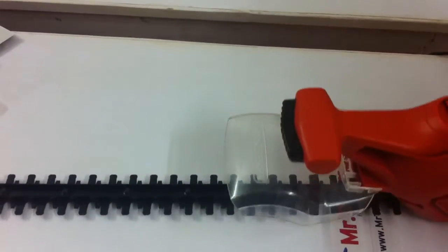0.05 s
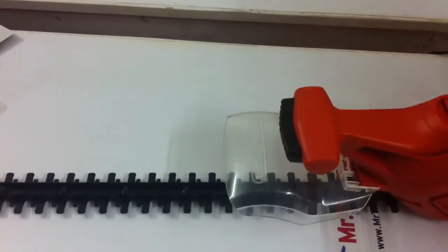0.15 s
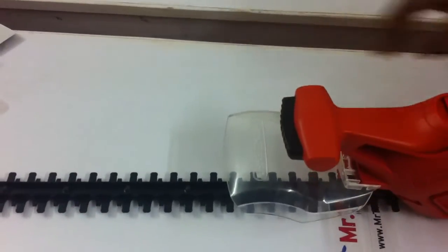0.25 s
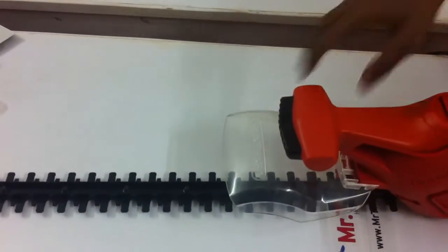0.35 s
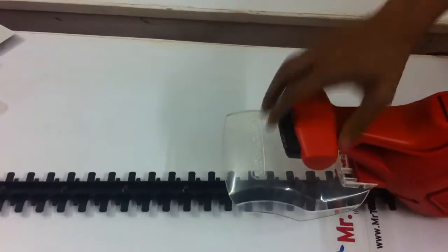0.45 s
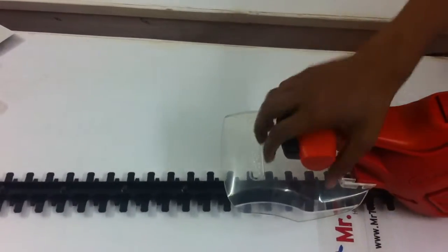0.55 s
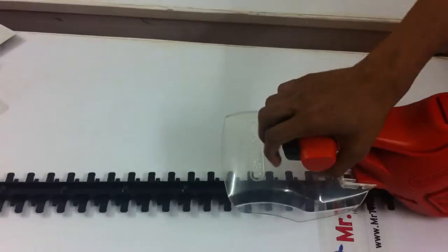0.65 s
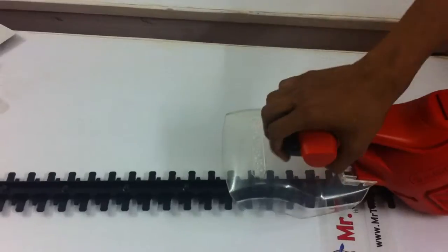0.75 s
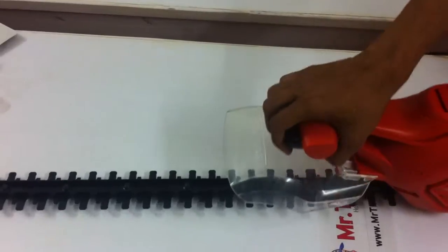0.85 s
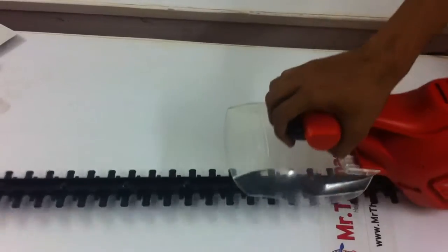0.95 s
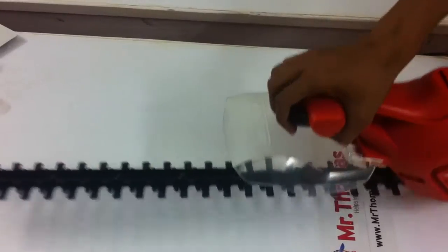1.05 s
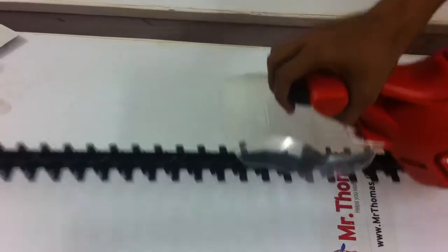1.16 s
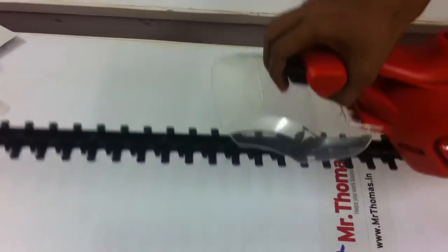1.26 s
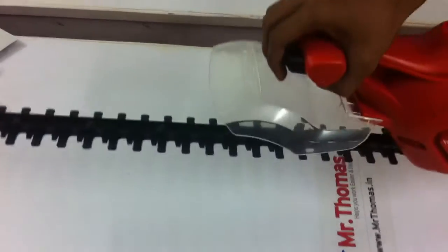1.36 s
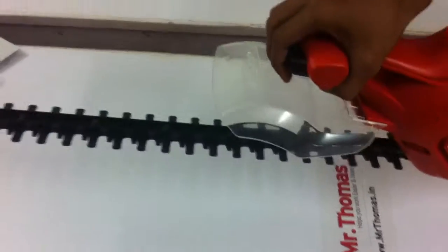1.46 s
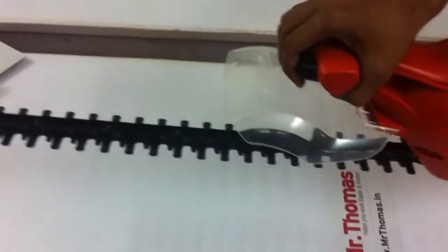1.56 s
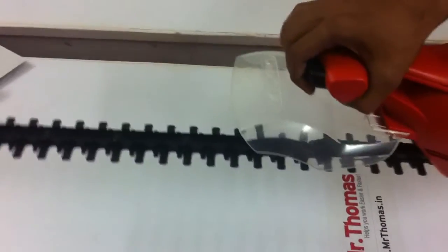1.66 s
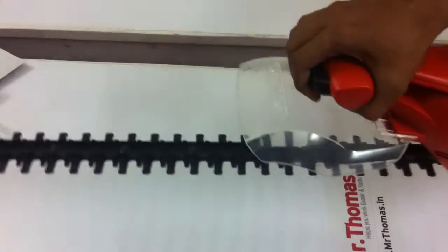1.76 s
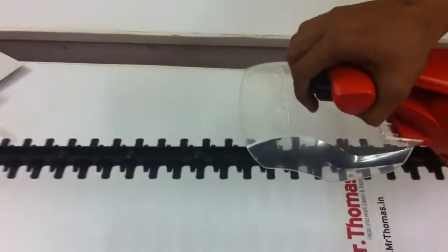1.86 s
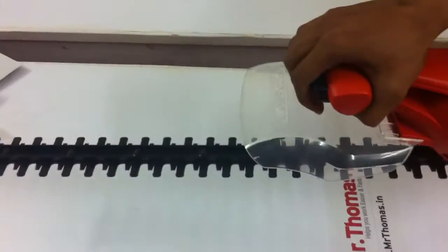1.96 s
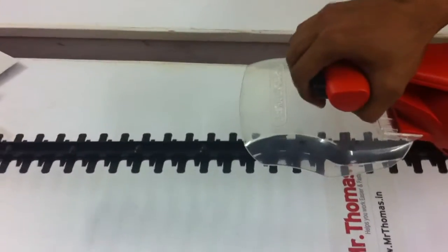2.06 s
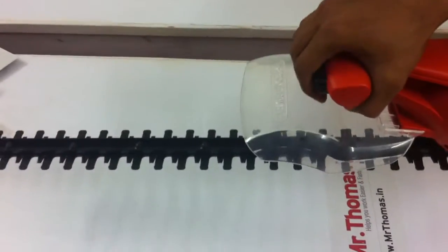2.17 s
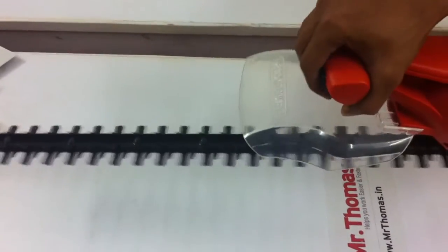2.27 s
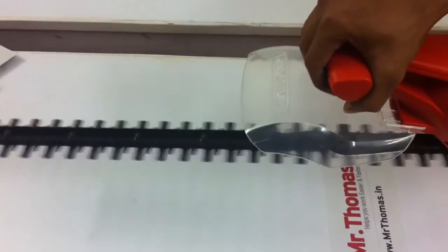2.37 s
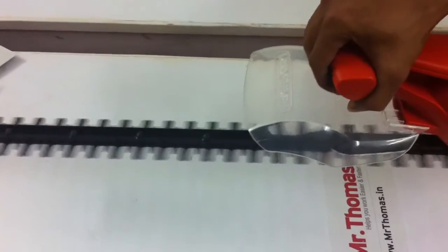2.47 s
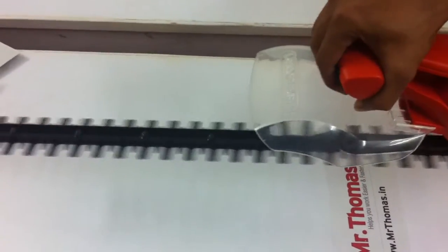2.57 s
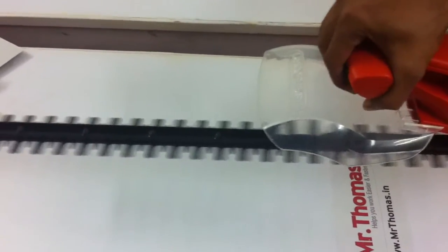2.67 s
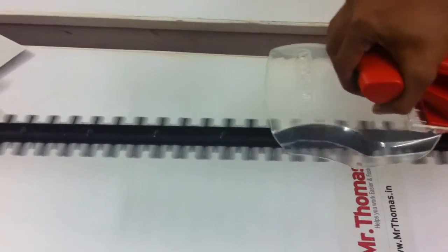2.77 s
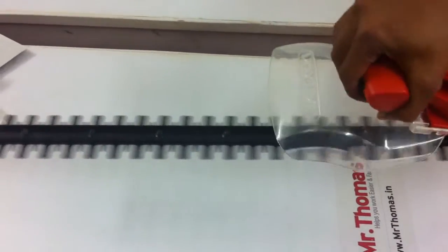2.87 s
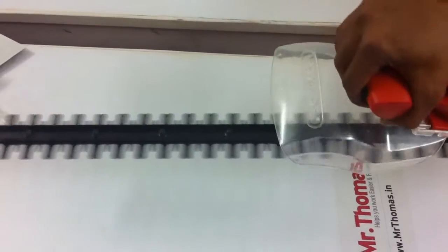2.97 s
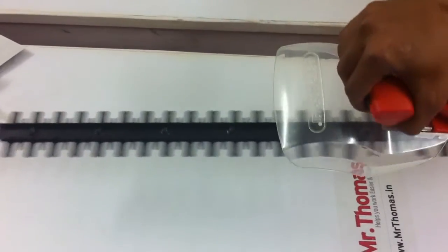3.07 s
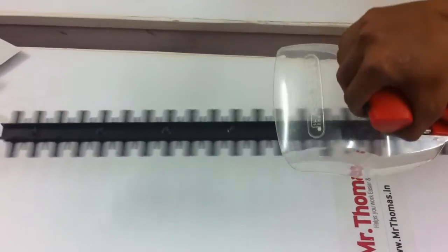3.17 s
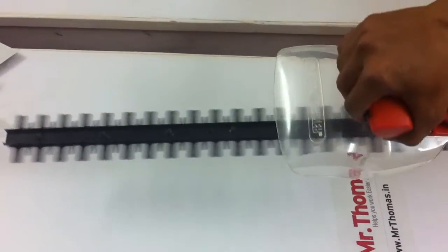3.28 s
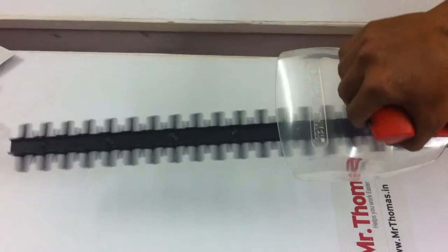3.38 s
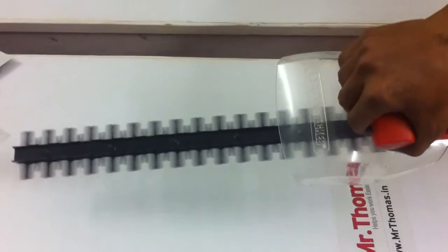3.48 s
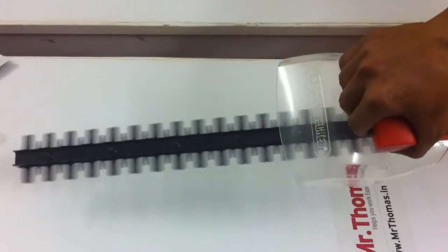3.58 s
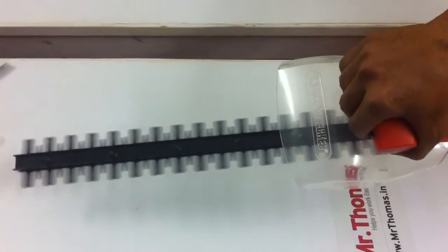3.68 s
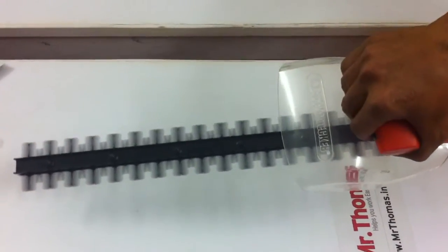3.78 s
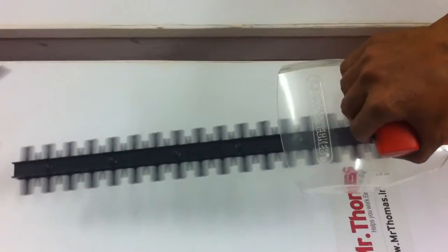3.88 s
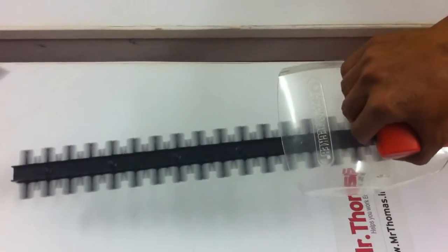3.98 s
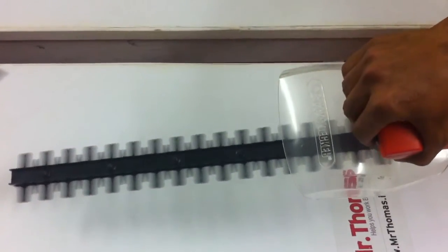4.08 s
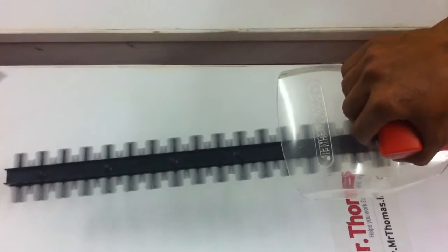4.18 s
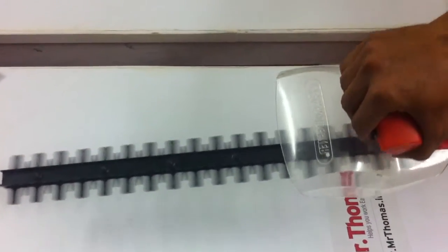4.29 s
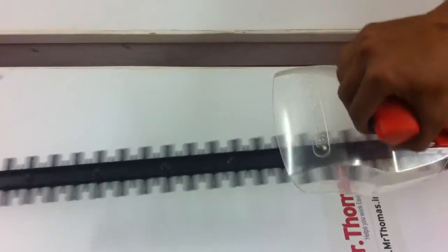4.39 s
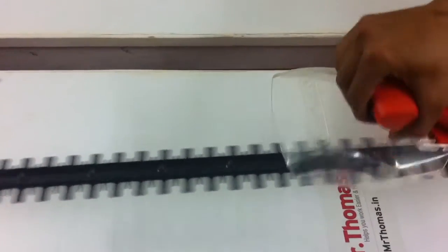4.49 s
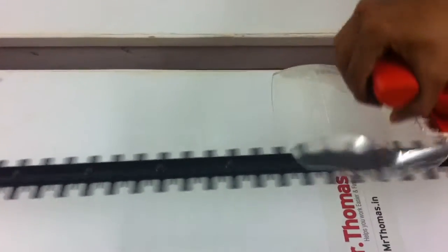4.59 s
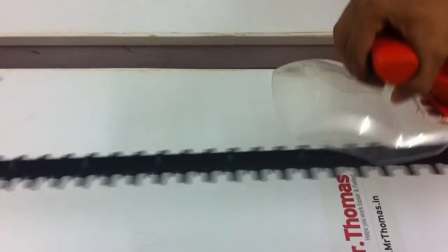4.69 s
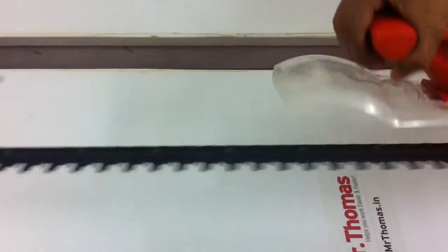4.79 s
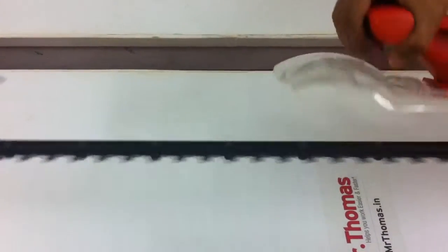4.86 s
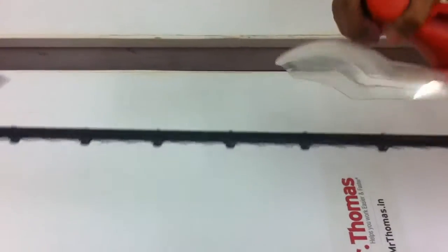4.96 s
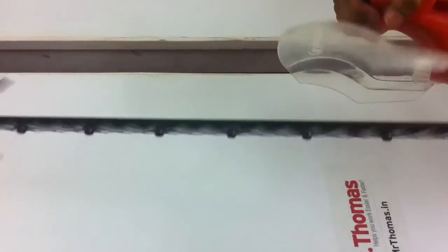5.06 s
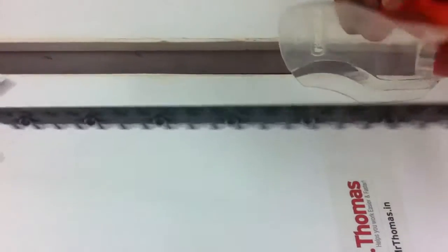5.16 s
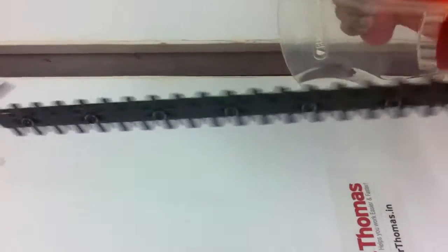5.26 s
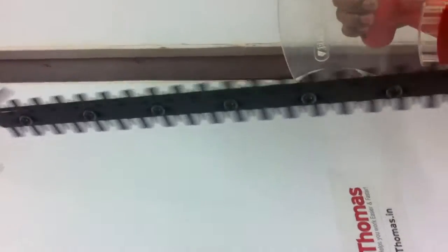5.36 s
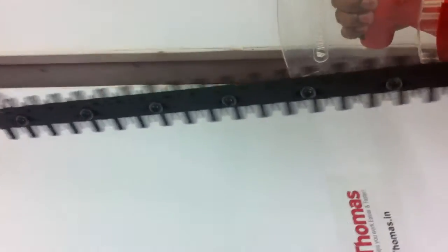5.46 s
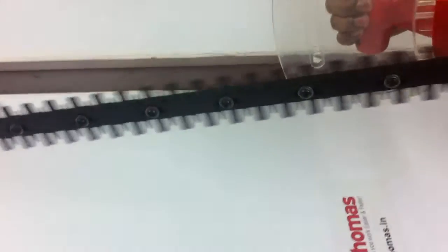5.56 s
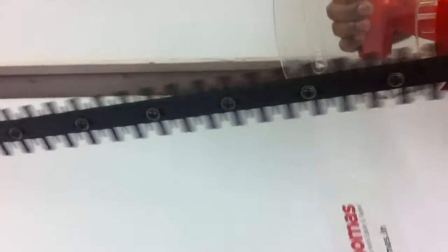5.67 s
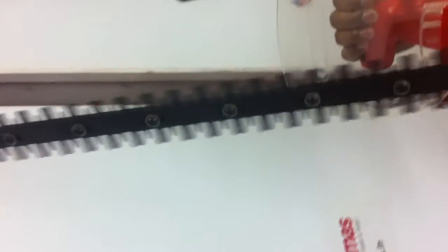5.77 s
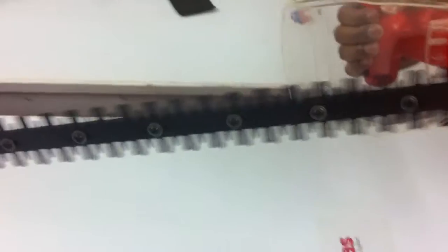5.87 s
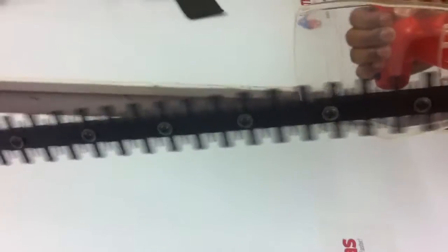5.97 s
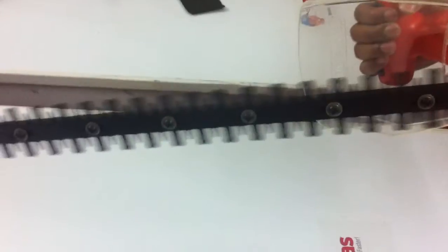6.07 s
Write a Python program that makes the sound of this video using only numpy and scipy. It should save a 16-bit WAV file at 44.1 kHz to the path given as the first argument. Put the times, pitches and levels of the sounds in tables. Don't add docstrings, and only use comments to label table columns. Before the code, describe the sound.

In a hard-walled room with a faint dull hum, a hand takes hold of a plastic tool handle with small clicks and soft rustle. More clicks follow, ending in a sharp switch snap. An electric hedge trimmer then runs up within a fraction of a second and stays on, a loud, bright, rattling buzz picked up close by one microphone.

```python
import sys
import numpy as np
from scipy import signal
from scipy.fft import rfft, irfft, next_fast_len
from scipy.io import wavfile
from scipy.ndimage import uniform_filter1d, minimum_filter1d

SR = 44100
rng = np.random.default_rng(int(sys.argv[2]) if len(sys.argv) > 2 else 0)


def ratio(d):
    e = np.asarray(d, float) / 20
    return 10 ** e


def to_wav(sig):
    pcm = np.clip(np.atleast_2d(sig), -1, 1) * 32767
    pcm = np.round(pcm).astype(np.int16)
    wavfile.write(sys.argv[1], SR, pcm.T)


N = 270333
START_S = 2.355


def rms_one(x):
    return x / np.sqrt(np.mean(x ** 2) + 1e-20)


def bump(x, centre, width):
    return np.exp(-((x - centre) / width) ** 2)


def drift(rate):
    step = 40
    r = np.exp(-2 * np.pi * rate * step / 2 * 2 / SR)
    noise = rng.standard_normal(N // step + 4002)
    slow = signal.lfilter([1], [1, -2 * r, r * r], noise)[4000:]
    return np.interp(np.arange(N) / step, np.arange(len(slow)), rms_one(slow))


def shaped(x, spectrum, levels_db, centres, patchy_db, peaks=(), count=17):
    size = next_fast_len(N)
    log_hz = np.log(np.arange(size // 2 + 1) * SR / size + 1)
    colour_hz, colour_db = np.transpose(spectrum)
    db = np.interp(log_hz, np.log(colour_hz), colour_db)
    for hz, width, top_db in peaks:
        db = db + top_db / (1 + (2 * (np.exp(log_hz) - hz) / width) ** 2)
    full = rfft(x, size) * ratio(db)

    log_centres = np.log(centres)
    zone = np.digitize(log_hz, (log_centres[1:] + log_centres[:-1]) / 2)
    mean_db = [np.median(curve) for curve in levels_db]
    missing_db = []
    for k, wanted_db in enumerate(mean_db):
        power = 2 * np.sum(abs(full[zone == k]) ** 2) / size / N
        missing_db.append(wanted_db - 10 * np.log10(power))

    out = np.zeros(N)
    knots = np.log(np.geomspace(70, 18000, count))
    for k, knot in enumerate(knots):
        window = np.interp(log_hz, knots, np.arange(count) == k)
        band = irfft(full * window, size)[:N]
        change_db = 0
        for j, curve in enumerate(levels_db):
            share = np.interp(knot, log_centres, np.arange(len(centres)) == j)
            change_db = change_db + share * (curve - mean_db[j])
        out += band * ratio(change_db + patchy_db * drift(3.0))
    return out * ratio(np.mean(missing_db))


def hum():
    # (frequency [Hz], density [dB per Hz])
    hum_colour = [(20, -42), (50, -39), (70, -16), (88, -29), (118, -5), (260, -.6), (447, -4.5),
                  (479, -12.5), (561, -7), (806, -13.5), (1110, -10), (2800, -27), (15600, -45.5)]
    # (time [s], width [s], gain [dB])
    rustles = [
        (.63, .15, 3),
        (2.27, .1, 2),
    ]
    t = np.arange(N) / SR
    knock = np.exp(-t / 0.075)
    low_db = -47.5 + 6 * knock
    high_db = -68 + 12 * knock + sum(db * bump(t, s, width) for s, width, db in rustles)
    noise = rng.standard_normal(N)
    return ratio(3.5) * shaped(noise, hum_colour, [low_db, high_db], [400, 6000], patchy_db=0.5, count=9)


def room(x):
    t60_s, wet_db = 0.4, -15
    size = next_fast_len(N + SR)
    hz = np.arange(size // 2 + 1) * SR / size
    t60 = t60_s / (1 + hz / 6000)
    tail = 0
    for k, lag in enumerate(rng.uniform(.007, .035, 7)):
        loop = ratio(-60 * lag / t60) * np.exp(-2j * np.pi * hz * lag)
        tail = tail + (-1) ** k * loop / (1 - loop) / 3
    return irfft(rfft(x, size) * (1 + ratio(wet_db) * tail), size)[:N]


def clicks():
    # (time [s], peak level [dB], ring [Hz])
    click_events = [(0.0014, -32, 3870), (0.5382, -47, 6900), (0.6467, -34, 3880), (0.6594, -42, 3170),
                    (0.677, -38, 3530), (0.6964, -48, 5780), (0.7194, -50, 3930), (1.6526, -50, 3030),
                    (1.9944, -50, 3570), (2.1685, -31, 3620), (2.1894, -55, 3210), (2.217, -38, 4020),
                    (2.3474, -23, 4310), (2.3545, -18.5, 6100)]
    # (multiple of ring, level [dB])
    plastic = [(.66, 3), (.85, -17), (1, 10), (1.2, 6), (1.45, -6), (1.9, 3), (2.6, -13), (3.4, -16)]
    ring_t60_s, tail_db = 0.0079, -15
    out = np.zeros(N)
    t = np.arange(SR // 4) / SR
    bright = signal.butter(2, [2300, 9000], "band", fs=SR, output="sos")
    rise = 1 - np.exp(-t / 0.00036)
    r = ratio(-60 / (ring_t60_s * SR))
    for s, db, hz in click_events:
        scuff, crack, tail = rng.standard_normal((3, len(t)))
        snap = signal.sosfilt(bright, crack) + 0.11 * np.diff(crack, prepend=0)
        sound = ratio(9.0) * snap * rise * np.exp(-t / 0.0013)
        push = scuff * rise * np.exp(-t / 0.0019)
        for multiple, mode_db in plastic:
            w = 2 * np.pi * min(hz * multiple, 15000) / SR
            mode = signal.lfilter([0, np.sin(w)], [1, -2 * r * np.cos(w), r * r], push)
            sound += 0.24 * ratio(mode_db) * mode
        diffuse = signal.sosfilt(bright, tail) * np.exp(-t / .025)
        sound = sound / np.max(abs(sound)) + ratio(tail_db) * diffuse
        at = round(s * SR)
        out[at:at + len(t)] += ratio(db) * sound
    return out


def motion():
    # (time [s], level [dB])
    sway = [(2.55, 1), (2.76, 1), (2.79, -1), (3.0, 1), (3.3, .5), (3.72, 0.1), (3.8, -1), (4.0, -1.05),
            (4.45, -0.5), (4.75, 1), (4.8, -0.6), (5.2, -0.6), (5.52, 1), (5.56, -1.6), (5.8, -0.6),
            (5.92, 1), (6.04, 0.1), (6.1, -3)]
    free_speed, critical_speed, critical_width = 449.2, 333, 80
    quick_share, quick_s, slow_s = .6857, .1209, .3043
    t = np.arange(N) / SR
    since = np.maximum(t, START_S) - 2.3353
    lag = quick_share * np.exp(-since / quick_s) + (1 - quick_share) * np.exp(-since / slow_s)
    speed = free_speed * (1 - lag)
    speed_db = 20 * np.log10(1 - lag)
    shake_db = 11.5 * bump(speed, critical_speed, critical_width)
    sway_s, sway_level_db = np.transpose(sway)
    sway_db = np.interp(t, sway_s, sway_level_db)
    roll = np.clip((t - 4.8) / (5.5 - 4.8), 0, 1)
    return t, speed, speed_db, shake_db, sway_db, roll


def motor_tones():
    orders_heard = [3, 6, 12, 20]
    order_db = [-7, -9, -16, -17]
    # (frequency [Hz], width [Hz], level [dB])
    slot_windows = [(3200, 170, -25), (3780, 260, -25), (3500, 700, -36)]
    # (frequency [Hz], width [Hz], level [dB])
    whine_windows = [(6500, 500, -32), (9300, 600, -30), (11300, 500, -34), (12700, 650, -21),
                     (15300, 1100, -25), (12000, 4000, -36)]
    slot_order, whine_order = 12, 40
    t, speed, speed_db, shake_db, sway_db, roll = motion()
    turns = np.cumsum(speed * (1 + .0008 * drift(4.0))) / SR

    def let_out(order, windows):
        return sum(ratio(db) * bump(order * speed, hz, width) for hz, width, db in windows)

    def tone(order, db):
        return np.sqrt(2) * ratio(db) * np.sin(2 * np.pi * order * turns)

    unbalance_db = -34.5 + 2 * speed_db + 1.5 * roll + 0.38 * shake_db
    unbalance_db += -6.5 * bump(t, 4.88, 0.17)
    out = tone(1, unbalance_db + 3 * drift(6))
    out += let_out(whine_order, whine_windows) * tone(whine_order, 4.5 * drift(60) - 1)
    slot_tones = tone(slot_order, 3 * drift(70)) + tone(slot_order / 2, -9 + 4 * drift(40))
    out += let_out(slot_order, slot_windows) * slot_tones
    for order, rel_db in zip(orders_heard, order_db):
        out += tone(order, unbalance_db + rel_db + 2.5 * drift(12.0))
    return out * (np.arange(N) > START_S * SR), turns


def impact_source(turns):
    impacts_per_s, grain_db, throb, turns_per_reversal = 10000, 2.2, .13, 6.62
    sizes = ratio(grain_db * np.minimum(rng.exponential(1, N), 4)) * rng.choice([-1, 1], N)
    impacts = (rng.random(N) < impacts_per_s / SR) * sizes
    reversal = np.cos(2 * np.pi * turns / turns_per_reversal + 1.2 * drift(7.6))
    swell = 1 + throb * reversal * ratio(2.4 * drift(9.9)) + 0.081 * np.cos(2 * np.pi * turns)
    return rms_one(impacts) * swell + 0.74 * rng.standard_normal(N)


def blade_bar(source):
    # (frequency [Hz], width [Hz], level [dB])
    bar_modes = [(1900, 160, -5), (3800, 160, -1), (6050, 200, -7), (6550, 190, 1), (6800, 150, -4),
                 (7550, 120, 0), (9200, 250, -8)]
    out = 0
    for hz, width, db in bar_modes:
        r = np.exp(-np.pi * width / SR)
        poles = [1, -2 * r * np.cos(2 * np.pi * hz / SR), r * r]
        mode = signal.lfilter([1, 0, -1], poles, source)
        out = out + rms_one(mode) * ratio(db + 2.5 * drift(4.0))
    return rms_one(out)


def rattle(turns):
    rattle_hz = [330, 800, 1700, 3300, 5500, 9500, 14000]
    # (frequency [Hz], density [dB per Hz])
    rattle_colour = [(20, -46), (60, -44), (100, -75), (166, -17.5), (288, -7.5), (333, -2), (400, -3.5),
                     (566, -8), (1810, -3.5), (2430, -8), (3340, -3.5), (4880, -9.5), (6700, -8.5),
                     (15600, -12)]
    # (frequency [Hz], width [Hz], gain [dB])
    body_modes = [(196, 9.5, 2), (342.6, 17, 4.5), (609, 12, 3), (730, 80, -2.5), (870, 60, 2.5),
                  (1770, 120, 2), (2300, 940, -4), (3020, 700, 2.5), (3780, 220, -3), (5550, 260, -2),
                  (5830, 850, 2), (7170, 240, 1), (9500, 1000, 1), (10900, 1500, -2)]
    # (level at free speed [dB], power of speed [1], share of sway [1],
    # gain by the roll [dB], share of the critical-speed shake [1])
    parts = [
        (-27, 1.44, .7, -2, 0.4),
        (-26.5, 1.33, 0.89, 2, -0.046),
        (-24.5, 0.53, 1.03, 0.2, 0.092),
        (-21.5, 0.99, 0.7, 0.1, -0.3),
        (-20.5, 1.17, 1, -1, 0.15),
        (-22.5, 1.05, 0.87, 1.7, -0.18),
        (-24.5, 1.6, 0.7, 1.4, .05),
    ]
    source = impact_source(turns)
    bar = blade_bar(source)
    t, speed, speed_db, shake_db, sway_db, roll = motion()
    slack_db = -7.5 * np.clip((2.38 + 0.0053 - t) / .016, 0, 1)
    parts_db = []
    for db, power, share, roll_db, shaken in parts:
        moving_db = power * speed_db + share * sway_db + roll_db * roll + shaken * shake_db
        parts_db.append(db + slack_db + moving_db)
    body = ratio(0.29) * shaped(source, rattle_colour, parts_db, rattle_hz, patchy_db=1.08, peaks=body_modes)
    bar_db = -33 + .3 * speed_db + slack_db + shake_db - 0.5 * roll
    on = np.clip((t - START_S) / 0.0037, 0, 1)
    return on * (body + bar * ratio(bar_db))


def scene():
    tones, turns = motor_tones()
    mono = room(clicks()) + rattle(turns) + tones + hum()
    return np.array([mono, mono])


def starved(x):
    weak_db, easing_db = -2.0, 2.8
    hz, _, z = signal.stft(x, SR, "cosine", nperseg=1152)
    power = uniform_filter1d(abs(z[:-1]) ** 2, size=4, axis=1)
    narrow = np.repeat(power.reshape(144, 4, -1).mean(axis=1), 4, axis=0)
    typical = np.exp(uniform_filter1d(np.log(narrow + 1e-30), size=48, axis=0))
    bassward = np.clip(10500 / (hz[:-1, None] + 1) - 1, 0, 9)
    limit_db = weak_db - easing_db * bassward
    z[:-1] *= narrow > typical * ratio(2 * limit_db)
    return signal.istft(z, SR, "cosine", nperseg=1152)[1][:N]


def masked(x):
    masked_db, look_ahead_s = -27, .013
    treble = signal.sosfiltfilt(signal.butter(3, 2500, "high", fs=SR, output="sos"), x)
    level = np.sqrt(uniform_filter1d(treble ** 2, size=88) + 1e-14)
    span = int(look_ahead_s * SR)
    coming = -minimum_filter1d(-level, size=span, origin=-(span // 2))
    hidden = 1. * (level < coming * ratio(masked_db))
    return x - treble * uniform_filter1d(hidden, size=44)


def fills(mono):
    # (time [s], low edge [Hz])
    fill_frames = [(.37, 5700), (.925, 9600), (1.11, 5200), (1.25, 6300), (1.88, 4700), (2.901, 5220),
                   (3.155, 4690), (3.34, 6290), (3.805, 4200), (3.806, 7600), (4.5, 5200), (5.594, 10340),
                   (5.851, 6390)]
    fill_db = -3.5
    side = np.zeros(N)
    window = np.sin(np.pi * np.arange(2048) / 2048)
    hz = np.arange(1025) * SR / 2048
    for s, low_hz in fill_frames:
        band = (hz > low_hz) * (hz < low_hz + min(.215 * low_hz, 1420))
        at = 4 + 1024 * (round((s * SR - 4) / 1024) - 1)
        level = np.std(irfft(rfft(mono[at:at + 2048] * window) * band)) * np.sqrt(2)
        noise = rms_one(irfft(rfft(rng.standard_normal(2048)) * band))
        side[at:at + 2048] += ratio(fill_db) * level * window * noise
    return side * [[1], [-1]]


def low_pass(x):
    return signal.sosfilt(signal.butter(12, 16960, fs=SR, output="sos"), x)


def record(dry):
    soft = .8 * np.tanh(dry[0] / .75)
    bass_cut = signal.butter(4, 130, "high", fs=SR, output="sos")
    bend = signal.sosfilt(bass_cut, soft - dry[0])
    top_cut = signal.ellip(14, .3, 85, 15720, fs=SR, output="sos")
    mono = masked(starved(signal.sosfilt(top_cut, dry[0] + bend)))
    return low_pass(mono + fills(mono))


dry = scene()
out = record(dry)
to_wav(out)
```